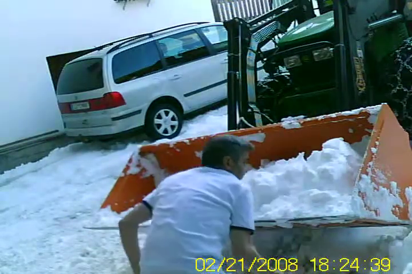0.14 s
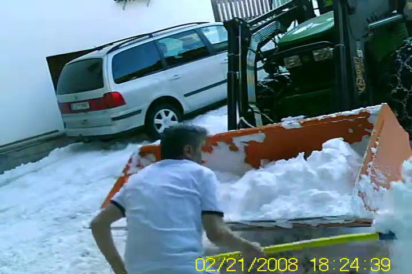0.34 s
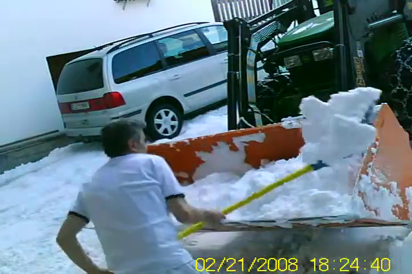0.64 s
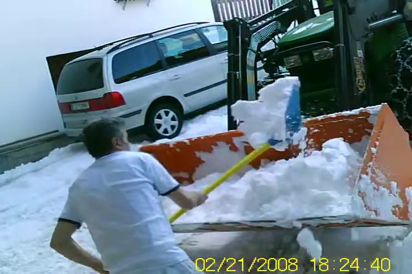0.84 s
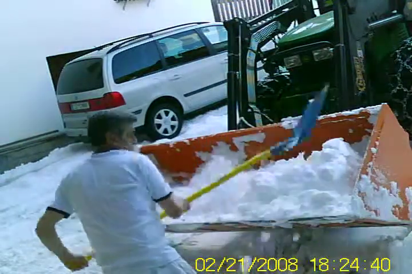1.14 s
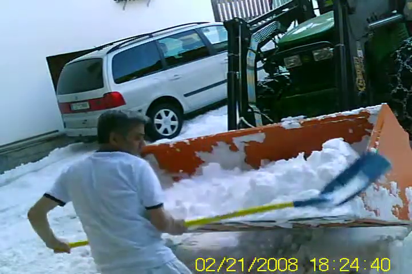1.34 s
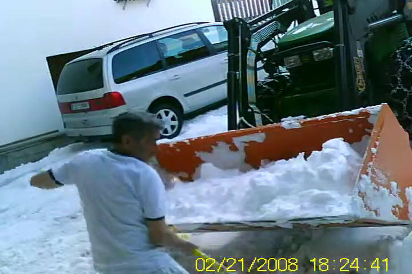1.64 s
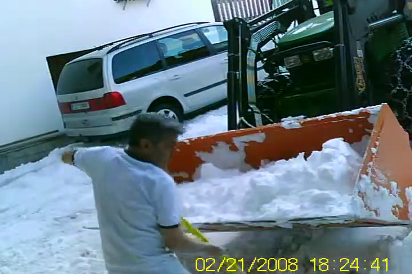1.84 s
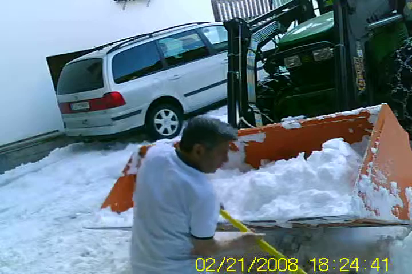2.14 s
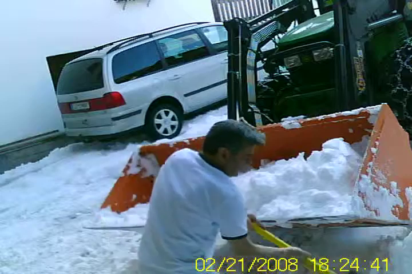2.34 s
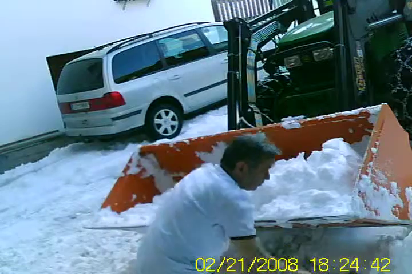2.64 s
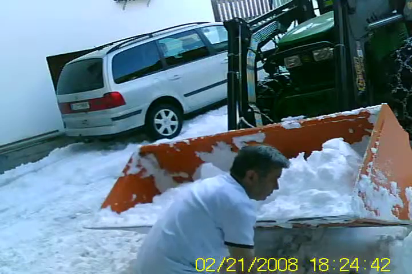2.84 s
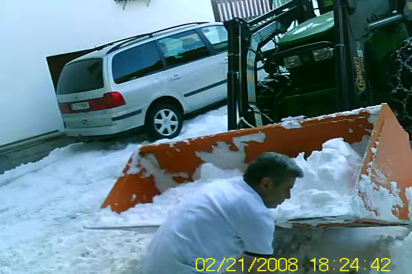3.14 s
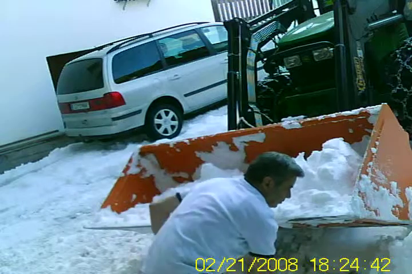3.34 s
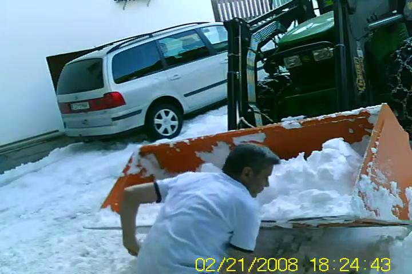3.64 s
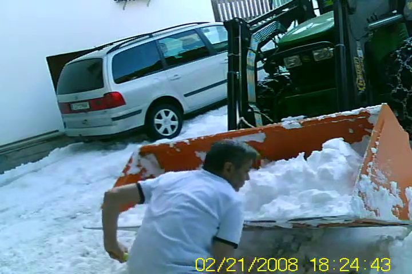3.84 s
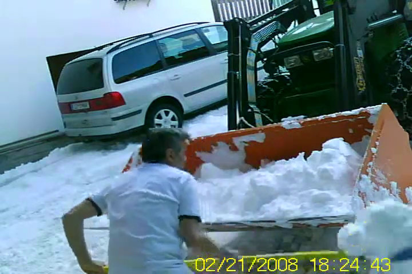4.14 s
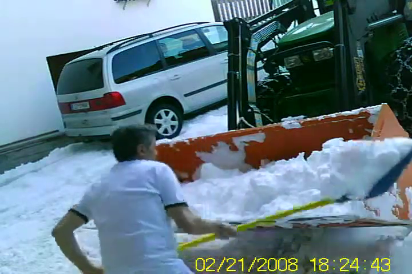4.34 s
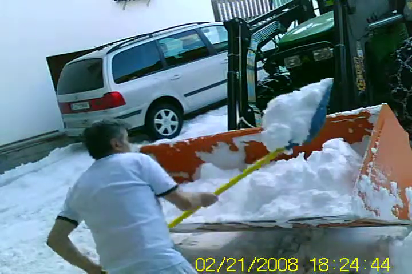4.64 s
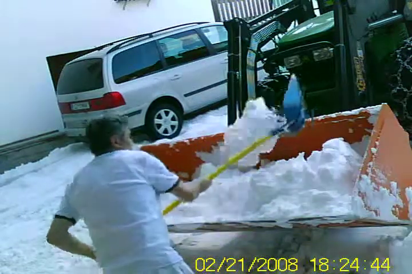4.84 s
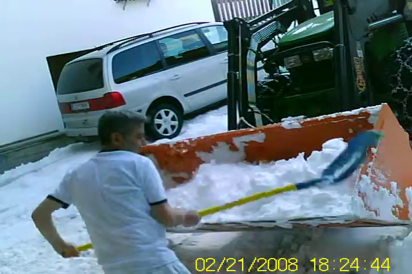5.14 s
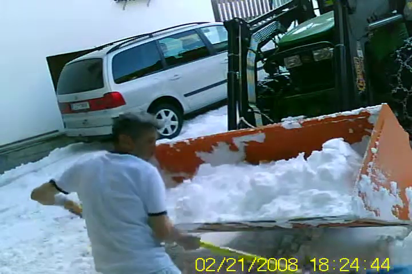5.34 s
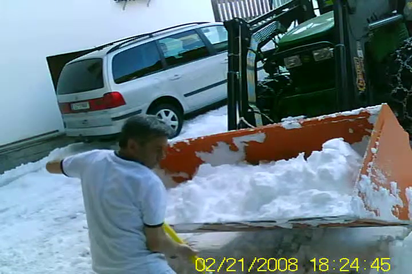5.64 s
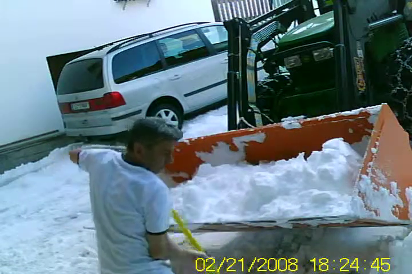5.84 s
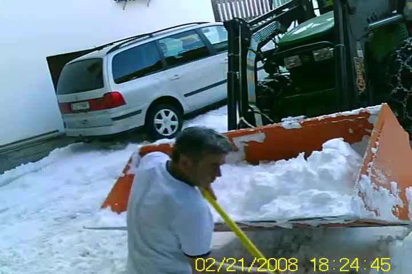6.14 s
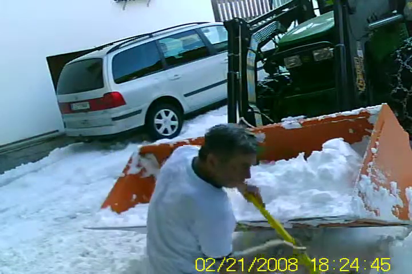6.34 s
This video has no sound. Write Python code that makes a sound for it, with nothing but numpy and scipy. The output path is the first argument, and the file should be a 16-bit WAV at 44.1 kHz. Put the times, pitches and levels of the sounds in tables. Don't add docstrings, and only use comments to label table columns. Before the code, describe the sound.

A small hissy microphone with low wind rumble sits in an echoing walled yard. Quiet scuffs and a sparrow's chirps come first, then a sharp plastic shovel crunch into icy snow at two seconds. Snow thumps into a steel bucket soon after three. Softer scrapes follow, with more chirping, until a far harder ram clatters on ice, overloads the microphone and grinds on to the end.

```python
import sys
import numpy as np
from scipy import signal
from scipy.fft import rfft, irfft
from scipy.io import wavfile
from scipy.ndimage import uniform_filter1d

SR = 44100
rng = np.random.default_rng(int(sys.argv[2]) if len(sys.argv) > 2 else 0)


def field_ratio(decibels):
    return 10 ** (np.asarray(decibels, dtype=float) / 20)


def wav_record(signal):
    frames = np.transpose(np.atleast_2d(signal))
    bounded = np.clip(frames, -1, 1)
    quanta = np.round(bounded * 32767).astype(np.int16)
    wavfile.write(sys.argv[1], SR, quanta)


N = 287091

# pitch [Hz], width [Hz], level [dB].
BLADE_MODES = [(431, 37, 0.5), (607, 85, -6.5), (771.5, 23, 0.5), (831, 27, 1.5), (1028, 65, -4),
               (1310, 30, -0.5), (1456, 19, -0.5), (1560, 33, -2.5), (1850, 42, -5), (2500, 230, 3),
               (3890, 180, 3.5), (5690, 300, -1), (7360, 670, -0.5), (9700, 650, 1)]


def in_time(rows, rest=-100):
    s, *columns = np.transpose(rows)
    return [np.interp(np.arange(N) / SR, s, c, left=rest, right=rest) for c in columns]


def rms_one(x):
    return x / np.sqrt(np.mean(x ** 2) + 1e-20)


def band(x, low_hz, high_hz, order=2):
    return signal.sosfilt(signal.butter(order, [low_hz, high_hz], "band", fs=SR, output="sos"), x)


def colour(x, points):
    hz, db = np.transpose(points)
    grid = np.maximum(np.fft.rfftfreq(N, 1 / SR), 1)
    gain = field_ratio(np.interp(np.log(grid), np.log(hz), db))
    return rms_one(irfft(rfft(x) * gain, N))


def drift(rate_hz):
    r = np.exp(-2 * np.pi * rate_hz / SR)
    noise = rng.standard_normal(N + SR)
    return rms_one(signal.lfilter([1], [1, -2 * r, r * r], noise)[SR:])


def resonate(x, hz, width_hz):
    r = np.exp(-np.pi * width_hz / SR)
    poles = [1, -2 * r * np.cos(2 * np.pi * hz / SR), r * r]
    return signal.lfilter([(1 - r * r) / 2, 0, (r * r - 1) / 2], poles, x + 1e-18)


def yard(x):
    t60_s, tail_db, first_echo_s = 0.38, -16.5, .012
    t = np.arange(SR // 2) / SR
    tail = rng.standard_normal(len(t)) * field_ratio(-60 * t / t60_s) * (t > first_echo_s)
    tail = band(tail, 190, 4100, order=1)
    tail = tail / np.sqrt(np.sum(tail ** 2))
    return x + field_ratio(tail_db) * signal.fftconvolve(x, tail)[:N]


def whistle(rows):
    s, hz, db = np.transpose(rows)
    start = round(s[0] * SR) - 200
    t = np.arange(start, min(round(s[-1] * SR) + 200, N)) / SR
    level = field_ratio(uniform_filter1d(np.interp(t, s, db, left=-100, right=-100), size=90))
    pitch = uniform_filter1d(np.interp(t, s, hz), size=120)
    out = np.zeros(N)
    out[start:start + len(t)] = level * np.sin(2 * np.pi * np.cumsum(pitch) / SR)
    return out


def hiss():
    # frequency [Hz], density [dB per Hz].
    hiss_spectrum = [(35, -41), (60, -1), (164, -5), (335, -12.5), (366, -17.5), (685, -14.5), (749, -18.5),
                     (819, -15.5), (1460, -20.5), (8550, -24.5), (10900, -28.5), (12500, -33), (16200, -92),
                     (22000, -120)]
    level_db = -59
    return field_ratio(level_db + .4 * drift(2)) * colour(rng.standard_normal(N), hiss_spectrum)


def wind():
    # time [s], level [dB].
    gusts = [(0.0, -55.5), (0.54, -56), (0.94, -57.5), (1.4, -48), (1.89, -55.5), (2.34, -53.5), (2.7, -54),
             (3.06, -54.5), (3.32, -52), (4.26, -59.5), (5.29, -55), (5.44, -48), (5.69, -52.5),
             (5.87, -52.5), (6.02, -56), (6.51, -58)]
    gust_db, = in_time(gusts, rest=-55)
    rumble = band(band(rng.standard_normal(N), 6.8, 31.3), 9.4, 150, order=1)
    return field_ratio(gust_db + 5.0 + 1.1 * drift(6.4)) * rms_one(rumble)


def effort():
    # time of full strength [s], rise [s], hold [s], fall [s], level [dB].
    # Rise and fall span 20 dB.
    glides = [(.565, 0.026, 0.23, 0.29, -58.5), (1.36, .05, 0.018, .12, -69),
              (1.555, .015, 0.096, 0.17, -65.5), (2.2, .05, 0.17, 0.28, -49), (3.27, 0.06, 0.04, .02, -68),
              (3.52, .08, .01, .04, -64), (4.48, 0.06, 0.14, .05, -57), (4.69, .02, .035, .06, -59),
              (5.29, .08, .02, 0.22, -65), (5.54, 0.022, 0.026, .05, -62), (5.669, .012, 0.025, .12, -61),
              (6.0, 0.16, 0.15, .01, -52.5)]
    grinds = [(0.796, 0.093, .02, 0.15, -55.5), (1.184, 0.26, 0.0075, 0.1, -56),
              (1.934, 0.083, 0.03, 0.17, -45.5), (2.0, .05, 0.029, .01, -48),
              (5.1, 0.028, 0.026, 0.078, -58.5), (4.995, .006, 0.018, 0.025, -52.5),
              (4.94, .05, .05, .02, -59), (5.791, 0.037, 0.0085, 0.079, -51),
              (5.929, 0.021, 0.022, 0.2, -50.5), (6.09, 0.056, 0.058, .01, -46),
              (6.36, 0.047, 0.069, 0.2, -34), (3.362, 0.034, 0.0025, 0.021, -39),
              (2.05, .02, 0.023, 0.16, -36.5)]
    shoves = [(.376, 0.031, .004, 0.018, -46), (1.01, 0.11, 0.17, 0.16, -52),
              (1.53, 0.18, 0.024, 0.33, -63), (2.066, 0.021, .01, 0.23, -30), (2.2, .05, 0.11, 0.092, -40),
              (2.43, 0.061, 0.022, 0.26, -47.5), (3.24, 0.13, 0.037, .02, -56),
              (3.307, .002, 0.0051, 0.12, -38), (3.365, 0.03, .002, 0.041, -30),
              (3.424, .03, .005, 0.03, -44), (3.68, 0.13, .01, .04, -62), (4.398, .002, .01, 0.088, -47),
              (6.366, .03, .02, 0.12, -49), (6.49, 0.066, 0.0081, 0.043, -30), (4.99, 0.12, .015, .03, -47),
              (5.042, .002, 0.022, 0.18, -37.5), (6.1285, 0.0019, 0.045, .02, -24)]
    rams = [
        (2.029, 0.0012, 0.025, 0.086, -26.5),
        (5.042, .004, 0.02, 0.022, -37),
        (5.075, 0.062, 0.015, 0.045, -39),
        (6.1285, 0.00089, 0.037, 0.038, -13.5),
        (6.172, .012, 0.0087, 0.0093, -15),
    ]
    stirs = [(.02, .05, 0.13, .08, -74), (.37, 0.053, .01, .15, -63), (1.36, .06, .01, 0.071, -59),
             (1.57, 0.088, 0.24, .05, -60.5), (2.01, 0.21, .01, .02, -48.5),
             (2.03, .001, .003, 0.036, -28.5), (2.3, .2, 0.02, 0.24, -51), (4.695, .03, .02, .04, -56),
             (5.093, 0.059, .01, 0.22, -47), (5.8, 0.58, .01, 0.085, -54), (6.13, 0.00089, 0.17, 0.13, -25),
             (3.366, 0.054, .01, 0.11, -38.5), (6.5, 0.048, .02, .1, -30)]
    sprays = [
        (.955, .02, .015, 0.037, -59.5),
        (1.022, .02, 0.014, .04, -64),
        (1.08, .02, .015, .04, -64),
        (1.15, .1, 0.054, .06, -62),
        (6.42, 0.015, 0.026, .04, -42),
        (2.15, .05, 0.25, 0.18, -56),
        (5.92, 0.021, .04, .05, -68),
    ]
    ploughs = [
        (6.19, 0.0046, 0.026, 0.091, -23.5),
        (6.25, .04, 0.054, 0.11, -22),
        (6.335, .03, .01, 0.31, -26),
        (6.43, .03, 0.023, 0.14, -33),
        (2.065, .01, .01, 0.055, -29),
        (2.1, .03, 0.019, 0.078, -35),
        (5.085, .02, 0.013, 0.05, -40),
    ]
    # packed-snow thump, blade body,
    # blade edge, ice crunch, bucket hollow [dB; ratio for linger].
    glide_db = [-6.5, -0.5, 1, -6.5, -8]
    grind_db = [-7, -4.5, 0.5, -3.5, -8.5]
    shove_db = [-0.5, -10, -15.5, -20, -17.5]
    ram_db = [-8.5, -0.5, -4.5, -11, -21]
    stir_db = [-40, -40, -40, -50, -2]
    spray_db = [-25, -20, -10, -1.5, -30]
    plough_db = [-22, -1.5, -8, -14, -32]
    shuffle_db = [-70, -80, -73, -101, -70]
    linger = [1.03, 1.07, 1.045, 1.1, 1.12]

    t = np.arange(0, N + 40, 20) / SR
    power = field_ratio(np.array(shuffle_db))[:, None] ** 2
    movements = [(glides, glide_db), (grinds, grind_db), (shoves, shove_db), (rams, ram_db),
                 (stirs, stir_db), (sprays, spray_db), (ploughs, plough_db)]
    for rows, drive_db in movements:
        for s, rise, hold, fall, db in rows:
            before = np.maximum(s - t, 0) / rise
            after = np.maximum(t - s - hold, 0) / (fall * np.c_[linger])
            loss_db = 20 * np.minimum(before + after, 10)
            power = power + field_ratio(db + np.c_[drive_db] - loss_db) ** 2
    return [np.interp(np.arange(N) / SR, t, 10 * np.log10(part)) for part in power]


def bucket(level_db):
    hollow_hz, width_hz = 365, 86
    hum = resonate(rng.standard_normal(N), hollow_hz, width_hz)
    hum = resonate(hum, hollow_hz, 2 * width_hz)
    return field_ratio(level_db - 3.0) * rms_one(hum)


def shovel(levels):
    # frequency [Hz], density [dB per Hz].
    crunch_spectrum = [(53, -16), (90, -4), (304, -3), (366, -5), (803, -5), (1160, 0.5), (1870, 3.5),
                       (2210, -4.5), (7310, -19.5), (9960, -29), (12500, -38), (16200, -93), (22000, -120)]
    # time [s], pitch [Hz], level [dB].
    skims = [
        [(5.895, 1850, -55), (5.92, 1760, -48.5), (5.945, 1560, -56), (6.02, 1530, -47), (6.07, 1525, -54),
         (6.125, 1530, -54)],
        [(5.99, 850, -69), (6.03, 840, -53), (6.07, 838, -61), (6.12, 834, -56)],
    ]
    sizes = field_ratio(3 * np.minimum(rng.exponential(1, N), 4)) * rng.choice([-1, 1], N)
    grains_per_s = 8000 * field_ratio(.8 * drift(60))
    grains = sizes * (rng.random(N) < grains_per_s / SR)
    crackle = colour(grains, crunch_spectrum)
    ringing = sum(field_ratio(0.5 * db) * resonate(crackle, hz, 0.73 * width) for hz, width, db in BLADE_MODES)
    blade = crackle + 0.99 * ringing

    edges_hz = [(65, 427), (400, 1075), (880, 2296), (2300, 21700)]
    trim_db = [-3.0, 0.78, 4.5, 4.5]
    judder = [(2.6, 10.0), (1.0, 15.3), (0.96, 30), (1, 29)]
    out = sum(whistle(rows) for rows in skims) * (1 + .45 * drift(45))
    for level_db, trim, (depth_db, rate_hz), edges in zip(levels, trim_db, judder, edges_hz):
        shake = field_ratio(depth_db * drift(rate_hz))
        out = out + field_ratio(level_db + trim) * shake * rms_one(band(blade, *edges))
    return out


def bites():
    # start [s], peak [dB], crack pitch [Hz], length [ms], blade ring over the crack [dB].
    catches = [(.361, -52.5, 1470, 4.2, 2), (.945, -57, 6540, 2.5, -15), (1.368, -51, 1690, 2.7, -3),
               (1.37, -47.5, 6060, 2.3, -17), (1.536, -48, 4900, 0.61, -15), (2.028, -24, 7000, 0.44, 5),
               (2.03, -29, 3940, 2.5, -9), (2.04, -13.5, 4080, 0.54, -3.5), (2.0438, -14, 4300, 0.5, -7),
               (2.0543, -26, 3500, 0.29, 3), (2.058, -37, 3700, 0.73, -9), (3.351, -39, 4800, 3.1, -1),
               (3.36, -34, 1680, 3, -8), (4.399, -36.5, 1260, 1, -14), (4.404, -42, 1190, 1.6, -10),
               (4.415, -43, 1150, 2.5, -17), (4.993, -45, 1820, 2.5, 0), (5.039, -31.5, 1810, 5.5, -2),
               (5.038, -36, 3890, 6.6, 4), (5.053, -37, 3860, 3.5, -8), (5.044, -48, 5900, 6, -15),
               (5.048, -47, 7630, 5.3, -15), (5.083, -39, 3000, 0.33, 3), (5.089, -39, 2500, 0.35, -3),
               (5.098, -45, 2200, 0.39, -3), (5.075, -40, 4000, 5.3, 0), (5.092, -47, 2540, 8, -15),
               (5.1, -46, 2100, 9, -15), (5.668, -48.5, 1310, 5.2, -5), (5.791, -45, 1306, 5.0, 5),
               (5.795, -51, 5030, 4.1, -5), (5.921, -51, 6000, 2.4, -12), (5.976, -54, 4500, 4.1, -9),
               (6.019, -39.5, 4370, 2, -16)]
    # start [s], peak [dB], crack pitch [Hz], length [ms], blade ring over the crack [dB].
    chatter = [(6.1282, 3, 5300, 0.21, -8.5), (6.138, -2.5, 7500, 0.21, -1), (6.144, 1, 3500, 0.53, -11),
               (6.1456, 0, 8700, 0.38, -9), (6.186, -6, 1160, 0.49, -7), (6.154, -15, 7000, 0.79, -13),
               (6.166, -13, 4000, 0.95, -15), (6.1497, -0.5, 7300, 0.17, -6),
               (6.1698, 0.5, 3200, 0.32, -6.5), (6.1805, 1, 4900, 0.19, -10.5),
               (6.197, -25, 6800, 0.45, -2), (6.23, -22, 6200, 1.01, 1), (6.287, -29, 2585, 4, 0),
               (6.353, -24, 4000, 2.8, -18), (6.355, -16.5, 1720, 2.4, -5), (6.423, -23.5, 7500, 0.47, -14),
               (6.437, -28, 4300, 1.5, -6), (6.243, -25, 5700, 1.1, -8), (6.246, -26, 2800, .8, -2),
               (6.269, -30.5, 9700, 1.3, -8), (6.275, -29, 9000, 0.68, -10), (6.297, -35, 9700, 0.84, -8),
               (6.347, -26, 4100, 1.27, -6), (6.361, -29, 6500, .6, -8), (6.424, -26, 4300, 0.92, -7),
               (6.435, -29.5, 7600, 2, -12), (6.498, -31, 8000, .6, -12), (6.359, -25, 5100, 0.73, -12),
               (6.358, -25, 2500, 1.5, -10), (6.44, -29, 8000, .8, -10), (6.215, -33, 3700, 1.8, -6),
               (2.029, -21, 1023, 7.5, -28)]
    out, kicks = np.zeros(N + SR), np.zeros(N)
    ms = np.arange(2000) * 1000 / SR
    for s, db, hz, length, ring_db in catches + chatter:
        burst = rng.standard_normal(len(ms)) * ms * np.exp(-ms / length)
        width_hz = min(0.2 * hz / length, 6000)
        crack = resonate(burst, hz, width_hz) + 0.048 * burst / length ** 2
        crack = band(crack, 49, min(1.72 * hz, 18000))
        out[round(s * SR):][:len(ms)] += field_ratio(db) * crack / np.abs(crack).max()
        kicks[round((s + length / 1000) * SR)] = field_ratio(db + ring_db)
    ringing = np.zeros(N)
    for k, (hz, width, db) in enumerate(BLADE_MODES):
        ringing += field_ratio(db) / width * (-1) ** k * resonate(kicks, hz, width)
    return out[:N] + 1200 * ringing


def thuds():
    # start [s], peak [dB], pitch [Hz].
    lumps = [(0.362, -38.5, 307), (1.01, -37, 145), (1.56, -44, 304), (2.043, -8, 420), (2.06, -25, 200),
             (3.307, -33, 320), (3.309, -25.5, 234), (3.322, -31, 277), (3.346, -24, 215),
             (3.3504, -13, 209), (3.3612, -13.5, 283), (3.371, -27, 397), (3.381, -30, 380),
             (3.39, -32, 332), (3.406, -21, 206), (3.423, -30, 330), (4.41, -32, 418)]
    # start [s], peak [dB], pitch [Hz].
    jolts = [
        (2.048, -51, 69.5),
        (6.131, -19.5, 48.3),
        (6.164, -25, 80.5),
        (6.142, -22, 130),
        (6.19, -27.5, 200),
        (6.357, -30, 200),
        (6.372, -30, 194),
        (6.388, -31, 190),
    ]
    out, t = np.zeros(N + SR), np.arange(SR // 4) / SR
    for s, db, hz in lumps + jolts:
        envelope = np.exp(-t * hz / 1.23) * np.minimum(t / 0.0029, 1)
        out[round(s * SR):][:len(t)] += field_ratio(db) * np.sin(2 * np.pi * hz * t) * envelope
    return out[:N]


def birds():
    # main note [s], level [dB], last note over usual [dB], pitch ratio.
    chirps = [
        (.468, -51.5, 1, 1),
        (1.452, -49.5, 0.5, 0.99),
        (2.952, -49.5, -3, 0.97),
        (3.685, -47, -3, 0.99),
        (4.711, -52.5, 0, 1.001),
        (5.538, -53.5, -0.5, 0.98),
    ]
    # time from the main note [s], pitch [Hz], level [dB].
    phrase = [
        [(-.038, 4250, -15), (-.024, 4470, -14), (-.008, 5360, -16)],
        [(0, 3295, -11), (.004, 3695, 0), (.009, 4126, 5), (.013, 4092, 5.5), (.024, 3800, 5.5),
         (.028, 4150, 3), (.031, 3550, 3), (.034, 3100, -14)],
        [(.033, 2720, -6), (.038, 2880, -10), (.044, 3440, -7), (.052, 3464, -1), (.06, 3110, -12),
         (.076, 2620, -9)],
    ]
    # time [s], pitch [Hz], level [dB].
    far_slurs = [
        [(.365, 3470, -62), (.372, 4030, -52), (.377, 4070, -64), (.385, 4070, -52), (.395, 3750, -57),
         (.401, 3100, -60)],
        [(.402, 3500, -56), (.412, 3300, -61), (.428, 2700, -63)],
        [(.555, 2800, -66), (.565, 3100, -69), (.59, 2550, -67)],
        [(1.14, 4400, -62), (1.16, 4000, -65), (1.18, 3370, -67)],
        [(1.2, 4000, -60), (1.217, 3500, -67), (1.243, 2500, -65)],
        [(1.31, 3100, -66), (1.325, 2880, -63), (1.34, 2770, -72)],
        [(2.285, 3950, -49), (2.295, 4020, -49.5), (2.312, 3890, -49)],
        [(3.34, 4100, -47), (3.35, 4200, -47), (3.37, 3920, -64)],
        [(3.545, 4100, -64), (3.56, 3700, -66), (3.575, 3500, -71)],
        [(3.59, 3900, -63), (3.6, 3700, -64.5), (3.615, 3530, -69)],
        [(5.92, 3460, -79), (5.93, 3660, -51), (5.945, 3580, -55)],
    ]
    warble_hz, warble_depth = 135, 0.44
    t = np.arange(N) / SR
    tremble = 1 + warble_depth * np.sin(2 * np.pi * warble_hz * t + 1.5 * drift(8))
    calls = tremble * sum(whistle(rows) for rows in far_slurs)
    for s, db, last_db, ratio in chirps:
        for k, note in enumerate(phrase):
            last = k == len(phrase) - 1
            placed = np.array(note) * [1, ratio, 1] + [s, 0, db + last_db * last]
            calls = calls + whistle(placed) * (tremble if last else 1)
    calls = calls * (1 + 0.23 * drift(180))
    echoes = [(.009, -18), (.016, -14), (.024, -18), (.038, -20)]
    walls = sum(field_ratio(db) * np.roll(calls, round(s * SR)) for s, db in echoes)
    return calls + walls + field_ratio(3.5) * (yard(calls) - calls)


def flares():
    # time of full strength [s], peak [dB], pitch [Hz].
    snags = [(2.034, -27, 602), (2.038, -31.5, 1270), (2.043, -33, 1514), (2.047, -30, 837),
             (2.053, -26, 565), (2.06, -31, 942), (2.067, -27, 200), (2.071, -32, 530), (2.091, -39, 1060),
             (2.098, -29, 188), (2.108, -39, 1060), (2.115, -36, 443), (2.123, -32, 209),
             (2.216, -33.5, 156), (2.23, -33, 180), (2.25, -44, 450), (2.272, -35, 100), (2.29, -37, 156),
             (2.31, -37.5, 173), (3.36, -41.5, 1560), (3.364, -38.5, 753), (3.403, -47, 707),
             (5.056, -43, 1343), (5.062, -38, 572), (5.063, -41, 1720), (5.076, -38, 800),
             (5.085, -39, 974), (5.089, -39, 778), (5.098, -42, 400), (5.128, -45, 700), (6.134, -19, 1720),
             (6.14, -17.5, 1530), (6.142, -20, 1340), (6.143, -22, 613), (6.149, -19, 790),
             (6.151, -19, 1850), (6.165, -14, 439), (6.168, -13.5, 788), (6.172, -16, 1446),
             (6.177, -17, 747), (6.181, -18.5, 1341), (6.202, -20.5, 606), (6.219, -26, 1563),
             (6.222, -17.5, 602), (6.225, -24, 810), (6.232, -24, 452), (6.244, -22.5, 818),
             (6.27, -23, 435), (6.276, -19.5, 562), (6.283, -26, 1690), (6.292, -23, 378),
             (6.296, -20, 778), (6.316, -27, 371), (6.323, -24, 696), (6.334, -23.5, 408), (6.41, -29, 560),
             (4.59, -54, 917), (1.155, -56, 1000), (1.2, -55, 1060), (.965, -54, 1810)]
    swell_s = .0055
    out, t = np.zeros(N + SR), np.arange(SR // 16) / SR
    swell = t / swell_s * np.exp(1 - t / swell_s)
    for (s, db, hz), turn in zip(snags, rng.random(len(snags))):
        ring = np.sin(2 * np.pi * (hz * t + turn))
        out[round((s - swell_s) * SR):][:len(t)] += field_ratio(db) * swell * ring
    return out[:N] * (1 + .3 * drift(150))


def scene():
    *blade_db, hollow_db = effort()
    work = bucket(hollow_db) + shovel(blade_db) + bites() + thuds() + flares()
    return (hiss() + wind() + yard(work) + birds())[None]


def low_pass(x):
    return signal.sosfilt(signal.butter(12, 17090, fs=SR, output="sos"), x)


def record(dry):
    ceiling, offset = .7, -.0114
    soft = signal.sosfilt(signal.cheby2(10, 60, 12800, fs=SR, output="sos"), dry)
    loud = soft / (1 + (soft / ceiling) ** 40) ** (1 / 40)
    loud = signal.sosfilt(signal.cheby2(10, 50, 16700, fs=SR, output="sos"), loud)
    return low_pass(loud + offset)


dry = scene()
out = record(dry)
wav_record(out)
```